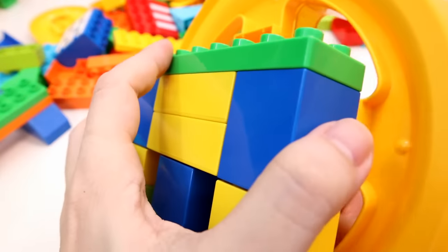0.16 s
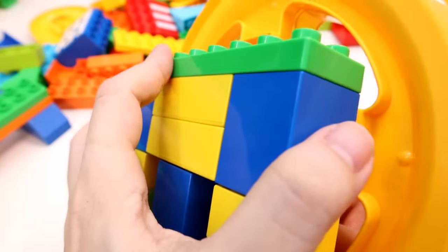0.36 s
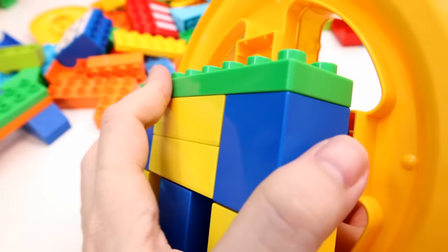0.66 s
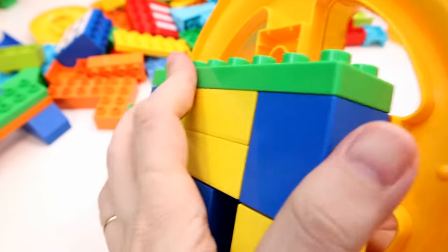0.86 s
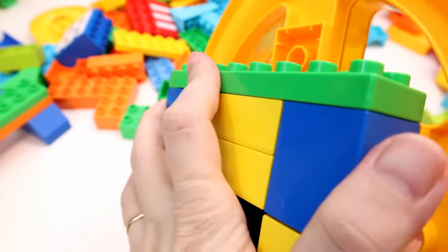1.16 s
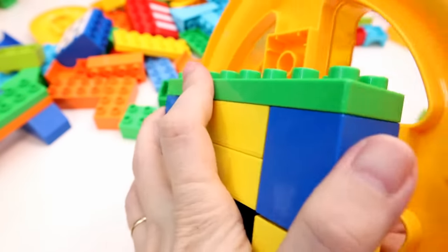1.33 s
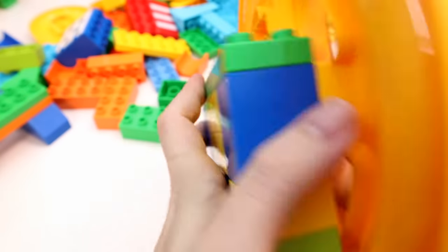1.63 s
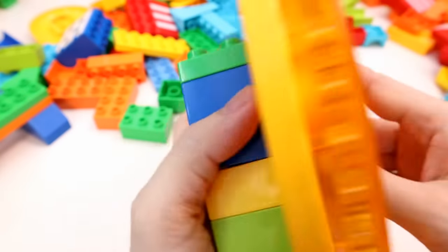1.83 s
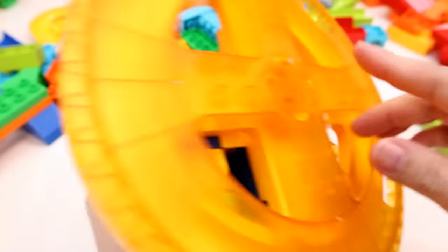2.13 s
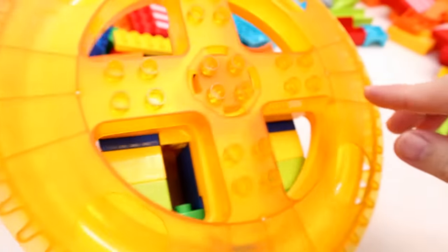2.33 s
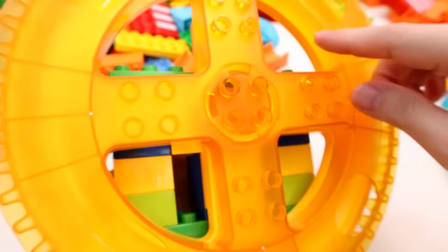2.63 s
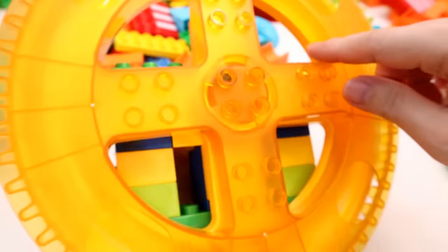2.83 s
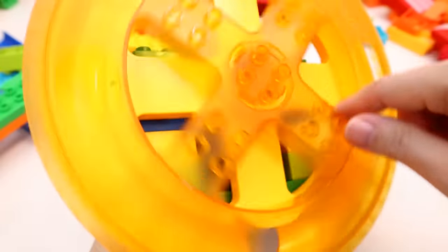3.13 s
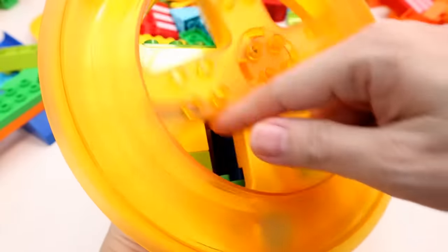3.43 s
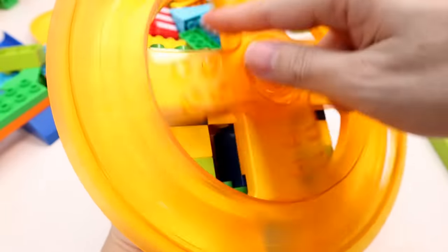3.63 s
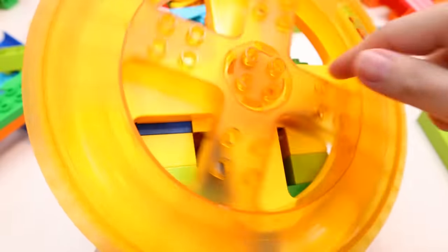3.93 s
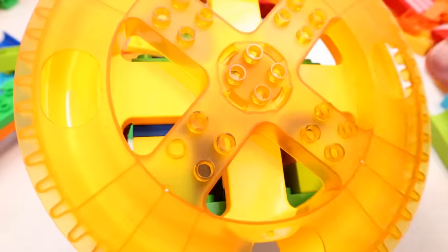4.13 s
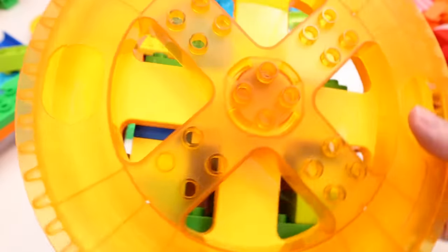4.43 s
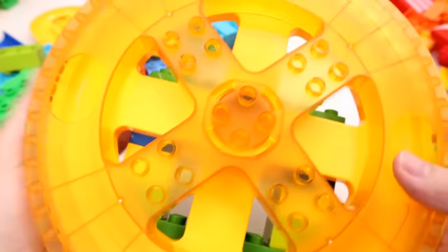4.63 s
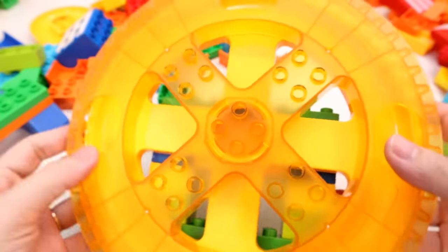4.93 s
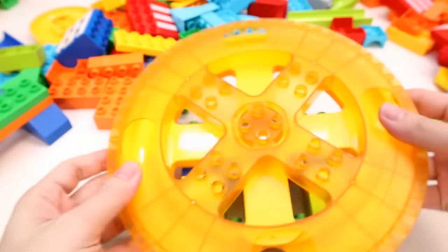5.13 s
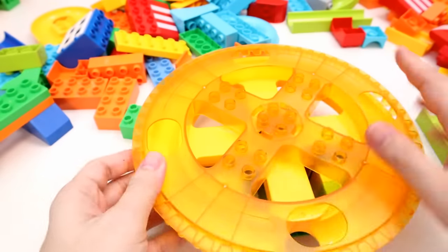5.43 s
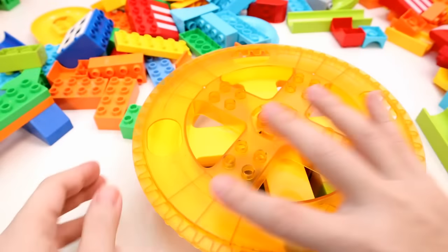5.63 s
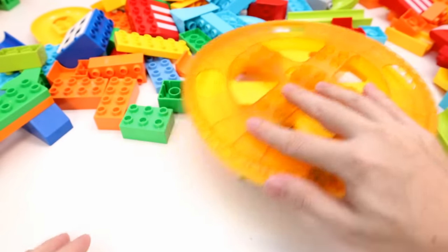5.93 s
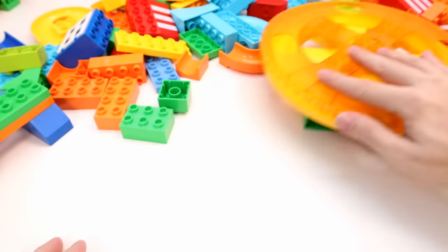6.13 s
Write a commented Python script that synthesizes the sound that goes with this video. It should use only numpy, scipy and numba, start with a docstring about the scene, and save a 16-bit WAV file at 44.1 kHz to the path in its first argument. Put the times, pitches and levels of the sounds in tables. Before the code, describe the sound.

A phone microphone close to the hands hears bright plastic joints cracking against a hollow wheel, thinning into small ticks and a quiet pause. Then the wheel spins with grainy rubbing and light irregular clicks, pauses, and gets one sharp hard knock. The toy is set down with clattering plastic and dull tabletop booms, then dragged off with a rough, slightly singing scrape. Short small-room reflections and soft low background rumble.

```python
"""Plastic joints snap and chatter as hands press a block tower onto a hollow wheel: blows ring the plastic's tones.
The wheel is then turned so that a marble rolls round the rim: tiny rubbing impacts ring and hiss.
Last, the tower is knocked down onto a table and slid away: the table top booms, the base scrapes, the rim sings.
All of it sits in a small room, with a low rumble and faint hiss behind, heard close by a two-port phone microphone."""
import sys
import numpy as np
from scipy import signal
from scipy.fft import rfft, irfft, next_fast_len
from scipy.io import wavfile
from scipy.ndimage import uniform_filter1d
from numba import njit

SR = 44100
rng = np.random.default_rng(int(sys.argv[2]) if len(sys.argv) > 2 else 0)


def pcm_store(signal):
    """Save signal as 16-bit PCM."""
    levels = np.round(np.clip(np.atleast_2d(signal), -1, 1) * 32767)
    wavfile.write(sys.argv[1], SR, levels.astype(np.int16).T)


N = 276507  # length in samples

# Background and microphone. The tone curves shape a sound: pitch_hz, relative_level_db
AIR_CURVE = [(15, -41), (25, -12), (59, -2), (181, -16), (271, -16), (326, -16.5), (363, -10), (394, -21),
             (462, -21), (501, -23), (558, -22.5), (952, -28.5), (2700, -35), (12400, -59), (15000, -71.5)]
HISS_CURVE = [(1500, -1.5), (3000, 9.5), (5000, 4.5), (7000, 0), (9000, -5), (12000, -14), (15500, -7.5)]
MIC_CURVE = [(25, -21.5), (45, -6), (80, -5.5), (6000, -0.5), (11000, -1), (13000, -2.5), (15500, -25.5)]
# echoes of the small room, band by band: pitch_hz, fade_by_60_db_s, level_db
ROOM_BANDS = [(139, 0.78, -31), (468, 0.27, -2.5), (1452, 0.25, -6), (2960, 0.2, -12.5),
              (3950, 0.056, -19.5), (9010, 0.2, -7.5)]

# Tones of the plastic parts: pitch_hz, relative_level_db
BLOCK_TONES = [(820, 11), (1200, 11), (1420, 10.5), (1640, 9.5), (1860, 15.5), (2040, 13.5), (2500, 11),
               (3070, 9.5), (3560, 2)]
WHEEL_TONES = [(710, -4.5), (980, -13), (1300, -4), (1550, -1), (1830, 7), (2020, 7.5), (2320, 2.5),
               (2600, 6), (3050, 7.5), (3700, 3), (4600, 0)]
TOWER_TONES = [(155, -1), (330, 6), (430, 4.5), (540, 6), (705, 14.5), (810, 2), (980, 14)]
# Tones of the hollow, the table top and the loose rim: pitch_hz, relative_level_db, fade_by_60_db_s
HOLLOW_TONES = [(279, -7, 0.031), (155.4, -16, 0.083)]
TABLE_TONES = [(91.25, 1, 0.53), (116.7, 5.5, 0.31), (159, -9.5, 0.78), (293, -17.5, 0.37)]
RIM_TONES = [(1900, 0, 0.1), (2600, -3, 0.09), (2400, -7, 0.07)]

# Block joints snapping, then knocks on the wheel:
# start_s, level_db, favoured_pitch_hz, crack_db and thud_db (against the ringing body), chatter_ms
SNAPS = [(0.0155, -18.5, 1860, -14, -13, 1.4), (0.0195, -12.5, 1180, -15, -26, 4.7),
         (0.0255, -4, 1570, -16, -17, 1.6), (0.0303, -7.5, 1900, -15, -13.5, 1.8),
         (0.036, -13, 1530, 6, -17.5, 0.95), (0.0445, -10.5, 1380, -25.5, -15.5, 4.8),
         (0.058, -20.5, 1790, -31.5, -27, 5.4), (0.066, -24.5, 1300, -29, -15.5, 3.5),
         (0.082, -30.5, 1730, -18, -17.5, 3), (0.089, -42, 2020, -30, -15, 3.1),
         (0.099, -39, 1680, -22, -20.5, 3), (0.11, -19, 1690, -19, -27.5, 3.7),
         (0.152, -9.5, 3760, -3, -10.5, 2.1), (0.155, -12.5, 1390, -26, -24.5, 2.65),
         (0.163, -25.5, 1250, -42, -15.5, 6.5), (0.173, -27.5, 1310, -36, -14, 1.9),
         (0.19, -29, 1830, -14, -20, 5.9), (0.205, -26.5, 1170, -23, -2, 2.6),
         (0.216, -21, 1220, -9.5, -14, 7.8), (0.227, -20.5, 2100, -22, -9.5, 2.5),
         (0.258, -20.5, 1440, -7.5, -16, 2.4), (0.262, -20, 1260, -10.5, -12, 2.5),
         (0.2745, -18.5, 1690, -12.5, -12.5, 2.5), (0.283, -39.5, 1700, -20, -0.5, 1.7),
         (0.305, -33.5, 1170, -16.5, 2, 2), (0.345, -29, 1240, -6, -9, 1.7),
         (0.384, -14, 1490, -11, -17.5, 0.4), (0.389, -19, 1430, -15, -11, 5.3),
         (0.394, -25.5, 2060, -20, -10, 2), (0.541, -26, 1350, -15, -10.5, 5.6),
         (0.602, -19.5, 1080, -15, -7, 3.6), (0.62, -23, 1220, -35, -4, 4),
         (0.637, -8.5, 1330, -11, -17, 4.4), (0.642, -6, 1920, -13, -18.5, 1.26),
         (0.65, -18.5, 1240, -23, 0, 11), (0.654, -26, 1600, -30, -1, 2.4),
         (0.66, -19.5, 1500, -24, -9.5, 6.6), (0.6645, -5.5, 1370, -5.5, -21.5, 1.5),
         (0.667, -1.5, 1200, -17, -26, 0.67), (0.677, -40, 1190, -22.5, -9, 3),
         (0.689, -36, 1360, -14, -14, 3.2), (0.6955, -15.5, 1880, -8, -28, 2),
         (0.699, -7.5, 2200, -20, -25.5, 1.6), (0.711, -37, 1720, -35, -16, 1.6),
         (0.72, -24.5, 1280, -24, -25, 5.9), (0.728, -21.5, 1920, -1, 0, 4),
         (0.735, -34.5, 1770, -20, -14, 3), (0.948, -34, 1380, -15, 1, 1.2),
         (0.954, -22.5, 1310, -11.5, -2, 2), (1.037, -28, 920, -0.5, -37, 1.7),
         (1.053, -35, 2800, -17, -29, 3.7), (1.1145, -24, 1960, 2.5, -13, 6.2),
         (1.118, -21.5, 1180, -17, -11.5, 2.8), (1.389, -22, 1730, -11.5, -10.5, 1.5),
         (1.695, -39, 818, -16, -16, 15), (1.725, -29.5, 1430, -6, -13, 3.7),
         (1.752, -39, 1030, 9.5, -31, 9.1), (1.822, -39.5, 1870, 0.5, -18, 3.1),
         (1.927, -29.5, 1690, -11, -35, 2.1), (2.058, -34.5, 1660, -17, -33.5, 2.5),
         (2.16, -33, 1480, -22, -15, 2.6)]
KNOCKS = [(2.795, -28, 2230, -5.5, -15, 3), (3.033, -44, 1870, -26, -10, 5.5),
          (3.206, -29.5, 2100, -2, -13, 3.7), (3.237, -35, 1850, -18, -11, 3.3),
          (3.243, -30, 1960, -15, -10, 2.6), (3.258, -31, 2680, 7, -23, 3.4),
          (3.32, -17, 2030, -15, -11, 9.8), (3.34, -29.5, 2040, 0, -2, 4), (3.346, -20, 1500, -16, -7, 11),
          (3.36, -24, 2090, -14, -5, 8.4), (3.374, -28, 2160, -15, 4.5, 2.3),
          (3.381, -20.5, 1840, -11, -4, 3.6), (3.387, -21.5, 1850, -37, -3, 4.2),
          (3.394, -17.5, 1490, -15, -6, 1.4), (3.409, -31, 1550, -25, -2, 1.2),
          (3.416, -28, 1550, -15, 2, 1.8), (3.44, -30, 2590, 1, -19, 4.7),
          (3.459, -23.5, 1380, -5, -9, 4.6), (3.478, -25, 2020, -8, -15, 3), (3.5, -32, 2070, 0, -8, 4.4),
          (3.5677, -29, 1850, -7, -8, 0.88), (3.612, -23, 1790, -15, -12, 4),
          (3.619, -28, 1810, -21, -16, 2.2), (3.6815, -20.5, 2040, -19, -21, 2.5),
          (3.689, -26, 2040, -22, -18, 3.3), (3.718, -25.5, 1980, -16, -8, 3.3),
          (3.791, -36, 1970, -24, -13, 1.7), (3.798, -31.5, 1900, -11, -4.5, 9.4),
          (3.809, -24, 1740, -20, -3, 2.1), (3.844, -36, 2060, -18, -20, 2.5),
          (3.86, -23, 1850, -4, -12, 2), (3.885, -27, 2020, -12, -10, 2.5), (3.893, -23, 2100, 1, -16, 5.4),
          (3.926, -25, 2070, -2, -27, 3.3), (3.969, -28, 2050, -14, -7, 3.1),
          (4.031, -51, 2010, -16, -16, 3), (4.053, -30, 2200, 4, -16, 2), (4.06, -29, 2090, -18, -24, 2.8),
          (4.076, -29, 2070, -5, -24, 4.5), (4.1, -28, 2700, 3, -24, 3.4), (4.171, -29, 2630, -7, -20, 2),
          (4.214, -42, 1900, -10, -18, 1.7), (4.234, -34, 1800, -10, -14, 5.4),
          (4.511, -26.5, 2330, -7.5, -9.5, 12), (4.533, -30, 1590, -4, -7, 10),
          (4.557, -34.5, 2130, -20, -0.5, 11), (4.592, -33.5, 2480, -6, -19, 10),
          (4.754, -29, 700, -29, 5.5, 1.8), (4.7605, 2, 2330, -11.5, -14.5, 2.9),
          (4.765, -18.5, 2050, -39, -6, 2.4), (4.795, -37, 1630, -31, -3, 3),
          (4.8245, -27, 1920, -19, -29, 3), (4.915, -35.5, 1810, -4, -15, 6.8),
          (4.935, -37.5, 1970, -12, -0.5, 7.3), (5.057, -12, 1900, -14.5, -11.5, 8.3),
          (5.176, -42, 1390, -2, -20, 7.1), (5.26, -34, 2620, -5, -30, 14),
          (5.307, -9, 1940, -9.5, -1, 6.8), (5.315, -15, 1990, -22, -6, 4.6),
          (5.326, -30, 1010, -25, 8.5, 4.4), (5.343, -23.5, 1000, -31, 0, 3.6),
          (5.465, -19, 780, -21, 2.5, 4.1), (5.52, -18, 890, -26, 4.5, 14),
          (5.575, -19.5, 443, -19, 18, 0.57), (5.577, -22, 537, -17, 17, 1.7),
          (5.576, -1, 1800, -4, -43, 4.4), (5.581, -2, 1910, -10, -36, 3.3), (5.588, -8, 1740, -13, -10, 3),
          (5.593, -2.5, 1750, -6.5, -14, 1.8), (5.598, -12, 2030, -4, -7, 5), (5.605, -7, 1870, -12, -5, 4),
          (5.615, -21, 1640, -17, -0.5, 4), (5.622, -24, 1850, -17, 3.5, 3.4),
          (5.63, -33, 1550, -16, -11, 5), (5.643, -29, 1810, -25, -8, 4), (5.651, -25, 2000, -17, -15, 4.6),
          (5.871, -27, 820, -23, -2.5, 14), (5.908, -30, 2270, -5, 1, 7.9), (5.981, -30.5, 970, 2, 13, 3.1)]
# the tower meets the table top: start_s, push_strength_db, push_length_ms
BUMPS = [(5.304, -16, 4), (5.313, -14, 8), (5.465, -19.5, 2.1), (5.472, -15, 4.1), (5.52, -23.5, 3.4),
         (5.578, -10.5, 3), (5.588, -11, 5.6), (5.62, -15.5, 9.1), (5.7, -27.5, 5.2), (5.879, -22, 7.6),
         (5.916, -16, 8.9), (5.97, -35, 9.1), (6.054, -33, 2.5), (6.243, -28.5, 10)]
# how the parts settle after a blow, in stages: level_against_blow_db, fade_by_60_db_s
SNAP_SETTLE = [(-18.5, 0.059), (-43, 0.4)]
KNOCK_SETTLE = [(-25.5, 0.037), (-30.5, 0.3)]
BUMP_RUMBLE = [(-25, 0.35)]
BUMP_SCRAPE = [(-26.5, 0.29)]

# fingers squeeze the tower and it creaks: hold_start_s, hold_s, level_db
SQUEEZES = [(0.154, 0.071, -38), (0.568, 0.028, -41), (1.747, 0.047, -51)]
# fingers brush the wheel: hold_start_s, hold_s, level_db, contact_pitch_hz
BRUSHES = [(2.057, 0.045, -66.5, 1740), (2.144, 0.024, -58.5, 1590), (2.266, 0.018, -76.5, 3280),
           (2.38, 0.1, -71, 1980), (4.591, 0.044, -44.5, 2170), (5.207, 0.24, -47.5, 2420),
           (5.569, 0.012, -36.5, 1840)]
# the wheel spins, marble and hub rubbing: time_s, level_db, contact_pitch_hz, hiss_db
SPIN = [(3.08, -66, 1920, -22), (3.16, -48.5, 1900, -19), (3.198, -35, 1870, -17), (3.25, -35, 2000, -13),
        (3.284, -39, 2030, -10), (3.394, -41, 1780, -5), (3.432, -45.5, 1930, 6), (3.504, -36, 2000, -10),
        (3.538, -43, 1950, -9), (3.622, -38, 1780, -5), (3.656, -42, 2050, 0), (3.692, -35, 1810, -8),
        (3.73, -44.5, 2070, -5), (3.796, -32.5, 1850, -10.5), (3.906, -40.5, 2000, -1.5),
        (4.022, -38.5, 2010, -5), (4.062, -33, 1950, -8), (4.186, -44, 2220, -11), (4.24, -45.5, 1750, -19),
        (4.3, -100, 1990, -15)]
# the tower slides away over the table: time_s, rub_level_db
SLIDE = [(5.88, -63), (5.95, -43), (6.0, -41.5), (6.07, -39), (6.13, -37.5), (6.19, -40), (6.27, -38)]
# how a rub feels: pressure_unevenness_db, contact_ring_db
ROLLING = (1.8, -2.5)
SETTLING = (.8, -14)

AIR_DB = -46
PORT_LAG = 3  # samples by which the left port hears the plastic later
TOP_HZ = 15600
RING_CYCLES, TOWER_CYCLES = 24, 14  # swings in which a tone fades by 60 dB, before any grip
RING_MAX_S = .022  # the hand holds the low tones shorter
SPREAD_DB = 2.5  # unevenness of each tone between the two ports
SNAP_PAN_DB, KNOCK_PAN_DB = -1, 1.2  # left minus right, before the port levels
SNAP_FIRST, KNOCK_FIRST = 1, 1.5  # size of the first contact of a hard blow
SNAP_SWELL_S, KNOCK_SWELL_S = .0018, .0015  # the chatter grows over this time
SOFT_DB, SOFT_FIRST = -20, .55  # at or below this level the first contact has only this share
CONTACT_MS, CRACK_FADE_S = 0.2, 0.0059  # later contacts of a chatter crack less
CREAK_HISS_DB, BRUSH_HISS_DB = -22.5, -13
RISE_DB_S, FALL_DB_S = 347.5, 98  # dB per second before and after a held touch
WANDER = .04  # typical share by which the contact pitch strays
SETTLE_DELAY_S, SETTLE_HZ, SETTLE_HISS_DB = 0.0031, 2060, -23
SLIDE_HZ, SLIDE_HISS_DB = 2376, -5
SLIDE_RUMBLE_DB, SLIDE_SCRAPE_DB, SLIDE_SING_DB = -0.5, -6.5, -7


def undb(db):
    """Turns decibels into a plain multiplier."""
    return 10 ** (np.asarray(db) / 20)


def unit(x):
    """Brings a sound to an average (rms) strength of 1."""
    return x / np.sqrt(np.mean(x ** 2))


def drift(size):
    """Slow random wandering of spread 1, smooth over about size samples."""
    smooth = uniform_filter1d(rng.standard_normal(N), size=size)
    return unit(uniform_filter1d(smooth, size=size // 2))


def fade_60(t, t60):
    """A fade that loses 60 dB in t60 seconds."""
    return np.exp(-np.log(1000) * t / t60)


def band_pass(x, low_hz, top_hz):
    """Keeps the sound between two pitches."""
    return signal.sosfilt(signal.butter(2, [low_hz, top_hz], "band", fs=SR, output="sos"), x)


def radiate(x, low_hz, top_hz):
    """Small parts move little air in the bass, and a soft contact dulls the top."""
    return band_pass(x, low_hz, top_hz)


def colour(x, curve):
    """Shapes a sound by a tone curve of pitches and levels."""
    size = next_fast_len(x.shape[-1])
    hz, db = np.transpose(curve)
    bin_hz = np.arange(size // 2 + 1) * SR / size
    gain = undb(np.interp(np.log(bin_hz + 1), np.log(hz), db))
    return irfft(rfft(x, size) * gain, size)[..., :x.shape[-1]]


@njit
def moving_band_pass(x, hz, width):
    """State-variable filter: keeps a band of given relative width around a moving pitch."""
    y, band, low = np.empty(len(x)), 0., 0.
    for i in range(len(x)):
        g = np.tan(np.pi * hz[i] / SR)
        v = (band + g * (x[i] - low)) / (1 + g * (g + width))
        band, low = 2 * v - band, low + 2 * g * v
        y[i] = width * v
    return y


def plastic(tones, cycles=RING_CYCLES):
    """Plastic tones fade in a set number of swings, but the hand stops the low ones sooner."""
    return [(hz, db, min(cycles / hz, RING_MAX_S)) for hz, db in tones]


def ring(force, modes, flip=1):
    """A force sets a body's tones ringing; with flip -1 neighbours start in opposite directions."""
    out = 0
    for k, (hz, db, t60) in enumerate(modes):
        r = fade_60(1 / SR, t60)
        w = 2 * np.pi * hz / SR
        tone = signal.lfilter([0, np.sin(w)], [1, -2 * r * np.cos(w), r * r], force)
        out = out + flip ** k * undb(db) * tone
    return out


def grains(count, rate, scatter_db):
    """Tiny impacts at random moments (rate per second), a few much harder than the rest."""
    moment, direction, strength = rng.random((3, count))
    hit = moment < rate / SR
    return hit * np.sign(direction - .5) * undb(-scatter_db * np.log(strength + 1e-4))


def read(table):
    """Draws each column as a line over time, with a soft-edged gate open while the table lasts."""
    t = np.arange(N) / SR
    s, *columns = np.transpose(table)
    gate = 1. * (t >= s[0]) * (t < s[-1])
    return uniform_filter1d(gate, size=800), [np.interp(t, s, column) for column in columns]


def settle(events, stages):
    """Loudness that follows each blow and dies away in stages."""
    kick = np.zeros(N + SR)
    for s, level_db, *_ in events:
        kick[int((s + SETTLE_DELAY_S) * SR)] += undb(level_db)
    out = sum(undb(db) * signal.lfilter([1], [1, -fade_60(1 / SR, t60)], kick) for db, t60 in stages)
    return uniform_filter1d(out[:N], size=200)


def stroke(hold_start_s, hold_s, level_db):
    """Loudness of a touch: rise, hold, fall."""
    t = np.arange(N) / SR
    rise_db = RISE_DB_S * np.clip(hold_start_s - t, 0, 1)
    fall_db = FALL_DB_S * np.clip(t - hold_start_s - hold_s, 0, 1)
    return undb(level_db - rise_db - fall_db)


def slide():
    """Loudness of the tower sliding over the table."""
    moving, (level_db,) = read(SLIDE)
    return moving * undb(level_db)


def air():
    """Building rumble and faint hiss; the two ports share the bass most, and the level wavers."""
    mid, side = colour(rng.standard_normal((2, N)), AIR_CURVE)
    side = colour(side, [(60, -20.0), (300, -3), (1500, 3.0), (5000, 4.0)])
    waver = unit(uniform_filter1d(rng.standard_normal(N), size=6000))
    both = mid + side * np.array([[1], [-1]])
    return undb(AIR_DB + 0.98 * waver) * both / np.std(mid)


def room(dry):
    """Walls send back a fading cloud of reflections, unlike at the two ports in the treble."""
    t = np.arange(SR // 2) / SR
    mid, side = rng.standard_normal((2, len(t)))
    echo = 0
    for hz, t60, db in ROOM_BANDS:
        difference = min((hz / 2000) ** 4.6, 1.2)
        both = mid + difference * side * np.array([[1], [-1]])
        band = band_pass(both, hz / 3.05, hz * 1.77)
        fade = fade_60(t, t60) * np.clip(t / 0.0023, 0, 1)
        echo = echo + undb(db) * band * fade / np.sqrt(np.sum(fade ** 2))
    return signal.fftconvolve(dry, echo, axes=1)[:, :N]


def table():
    """Bumps and the tower's drag drive the table's low tones; the base scrapes and the loose rim sings."""
    force = np.zeros(N)
    for s, push_db, push_ms in BUMPS:
        push = np.hanning(int(push_ms * SR / 1000))
        force[int(s * SR):][:len(push)] += undb(push_db) * push / push.sum()
    bumps = ring(force, TABLE_TONES)
    rumble = unit(radiate(ring(rng.standard_normal(N), TABLE_TONES), low_hz=67.8, top_hz=400))
    base = ring(grains(N, 5100, 1.1), plastic(TOWER_TONES, TOWER_CYCLES))
    scrape = unit(radiate(base, low_hz=205, top_hz=1420))
    sing = unit(radiate(ring(rng.standard_normal(N), RIM_TONES), low_hz=1500, top_hz=3170))
    rocking = settle(BUMPS, BUMP_RUMBLE) * rumble + settle(BUMPS, BUMP_SCRAPE) * scrape
    # the base grips and lets go, so the rumble swells and sinks
    catch = undb(4.5 * unit(uniform_filter1d(rng.standard_normal(N), size=1800)))
    drag = undb(SLIDE_RUMBLE_DB) * catch * rumble
    drag = drag + undb(SLIDE_SCRAPE_DB) * scrape + undb(SLIDE_SING_DB) * sing
    return 0.35 * bumps + rocking + slide() * drag


def friction(tones, spot_hz, hiss_db, rate, scatter_db, flutter_db, grip, spot_db):
    """Stick-slip grains, unevenly pressed, ring hand-damped plastic; a straying contact spot rings and hisses."""
    force = grains(N, rate, scatter_db) * undb(flutter_db * drift(size=500))
    ports = [[(hz, db + side * (-1) ** k * SPREAD_DB) for k, (hz, db) in enumerate(tones)]
             for side in (1, -1)]
    body = np.array([ring(force, plastic(port, grip * RING_CYCLES)) for port in ports])
    body = radiate(body, low_hz=1280, top_hz=4830)
    spot_hz = spot_hz * np.exp(WANDER * drift(size=1800))
    spot = moving_band_pass(moving_band_pass(force, spot_hz, .14), spot_hz, .14)
    pressure = uniform_filter1d(np.abs(force), size=200)
    hiss = colour(pressure * rng.standard_normal((2, N)), HISS_CURVE)
    return unit(unit(body) + undb(spot_db) * unit(spot)) + undb(hiss_db) * unit(hiss)


def creak():
    """Squeezed and settling blocks rub at their joints and creak."""
    rub = friction(BLOCK_TONES, np.full(N, 1500.), CREAK_HISS_DB, rate=3000, scatter_db=2.0,
                   flutter_db=1.5, grip=0.4, spot_db=-19)
    strain = settle(SNAPS, SNAP_SETTLE) + sum(stroke(*row) for row in SQUEEZES)
    return strain * rub


def wheel_rub():
    """Spin, brushes, slide and settling rub the wheel; the louder each is, the more it sets pitch and feel."""
    turning, (spin_db, spin_hz, spin_hiss_db) = read(SPIN)
    # each part: loudness, contact pitch, hiss, unevenness, contact ring
    parts = [(turning * undb(spin_db), spin_hz, spin_hiss_db, *ROLLING),
             (slide(), SLIDE_HZ, SLIDE_HISS_DB, *SETTLING),
             (settle(KNOCKS, KNOCK_SETTLE), SETTLE_HZ, SETTLE_HISS_DB, *SETTLING)]
    for s, hold_s, db, hz in BRUSHES:
        parts.append((stroke(s, hold_s, db), hz, BRUSH_HISS_DB, *ROLLING))
    loud = sum(part[0] for part in parts)
    spot_hz, hiss_db, flutter_db, spot_db = (
        sum(part[0] * part[k] for part in parts) / loud for k in range(1, 5))
    return loud * friction(WHEEL_TONES, spot_hz, hiss_db, rate=5000, scatter_db=.9,
                           flutter_db=flutter_db, grip=0.59, spot_db=spot_db)


def chatter_force(size, level_db, chatter_ms, first, swell_s):
    """A first contact, then many small ones that swell and die away."""
    t = np.arange(size) / SR
    force = grains(size, 3500, 1.9) * .4 * np.clip(t / swell_s, 0, 1)
    force *= np.exp(-1000 * t / max(chatter_ms, .5))
    force[0] = first * np.interp(level_db, [SOFT_DB, 0], [SOFT_FIRST, 1])
    return np.convolve(force, np.hanning(int(CONTACT_MS * SR / 1000)))[:size]


def crackle(force):
    """Each contact sprays a short burst of hiss, weaker as the chatter goes on."""
    t = np.arange(len(force)) / SR
    spray = rng.standard_normal((3, 240)) * np.exp(-np.arange(240) / 50)
    ports = spray[0] + 1.2 * spray[1:]  # one shared burst plus one for each port
    contacts = np.abs(force) * np.exp(-t / CRACK_FADE_S)
    crack = signal.fftconvolve([contacts], ports, axes=1)[:, :len(force)]
    return radiate(colour(crack, HISS_CURVE), low_hz=1710, top_hz=8000)


def hits(events, tones, hollow, first, swell_s, pan_db, focus_db, hard_focus_db, focus_oct, flip):
    """Each blow chatters, cracks and thuds; the struck spot favours tones near one pitch."""
    out, size = np.zeros((2, N + SR)), SR // 16
    for s, level_db, spot_hz, crack_db, thud_db, chatter_ms in events:
        force = chatter_force(size, level_db, chatter_ms, first, swell_s)
        reach_db = np.interp(level_db, [SOFT_DB, 0], [focus_db, hard_focus_db])

        def near_db(hz):
            """Extra level for tones close to the struck spot's pitch."""
            return reach_db * np.exp(-(np.log2(hz / spot_hz) / focus_oct) ** 2)

        # each tone varies a little and reaches the two ports unevenly
        sway = rng.standard_normal((len(tones), 3))
        struck = [[(hz * (1 + .02 * a), db + 1.5 * b + side * SPREAD_DB * c + near_db(hz))
                   for (hz, db), (a, b, c) in zip(tones, sway)] for side in (1, -1)]
        blow_flip = flip if level_db > SOFT_DB else -1
        body = np.array([ring(force, plastic(port), flip=blow_flip) for port in struck])
        # a softer contact cracks less and leaves the upper tones unstruck
        top_hz = np.clip(4800 * 2 ** ((crack_db + 10.0) / 14), 1400, 9000)
        body = radiate(body, low_hz=785, top_hz=top_hz)
        crack = crackle(force)
        thud = ring(force, [(hz, db + near_db(hz), t60) for hz, db, t60 in hollow])
        thud = radiate(thud, low_hz=102, top_hz=1370)
        layers = [(body, 0), (crack, crack_db), (thud, thud_db)]
        blow = sum(undb(db) * x / np.abs(x).max(axis=-1, keepdims=True) for x, db in layers)
        at = int(s * SR)
        out[:, at:at + size] += blow * undb(level_db + np.array([[pan_db], [-pan_db]]) / 2)
    return out[:, :N]


def knocks():
    """Knocks ring the wheel, with a thud from the packed tower."""
    return hits(KNOCKS, WHEEL_TONES, plastic(TOWER_TONES, TOWER_CYCLES), KNOCK_FIRST, KNOCK_SWELL_S,
                KNOCK_PAN_DB, focus_db=8, hard_focus_db=3, focus_oct=.22, flip=1)


def snaps():
    """Joints give way gradually and ring the blocks, with a hollow thud."""
    return hits(SNAPS, BLOCK_TONES, HOLLOW_TONES, SNAP_FIRST, SNAP_SWELL_S,
                SNAP_PAN_DB, focus_db=11, hard_focus_db=11, focus_oct=.2, flip=-1)


def scene():
    """Adds up the close plastic, the table, the room and the air."""
    plastic_sound = snaps() + knocks() + creak() + wheel_rub()
    left, right = plastic_sound
    near = np.array([undb(0.5) * np.roll(left, PORT_LAG), undb(1.5) * right])
    boom = table()
    return near + boom + room(plastic_sound + boom) + air()


def record(dry):
    """Peaks beyond full scale clip; the phone's microphone thins bass and top, and the top is cut."""
    heard = colour(np.clip(dry, -1, 1), MIC_CURVE)
    return signal.sosfilt(signal.ellip(8, .2, 70, TOP_HZ, fs=SR, output="sos"), heard)


dry = scene()
out = record(dry)
pcm_store(out)
```